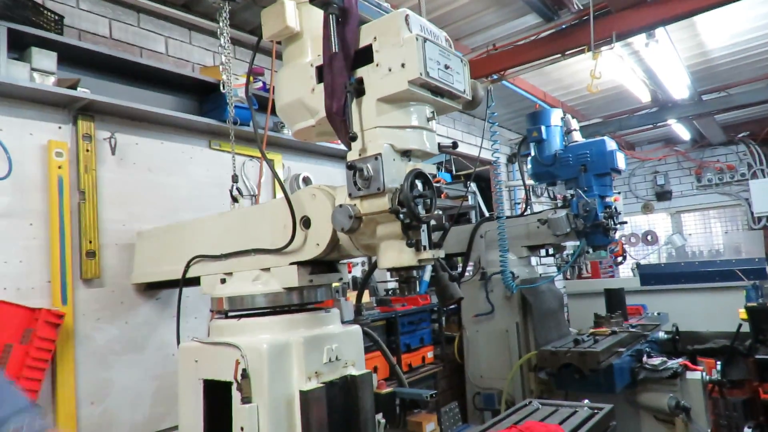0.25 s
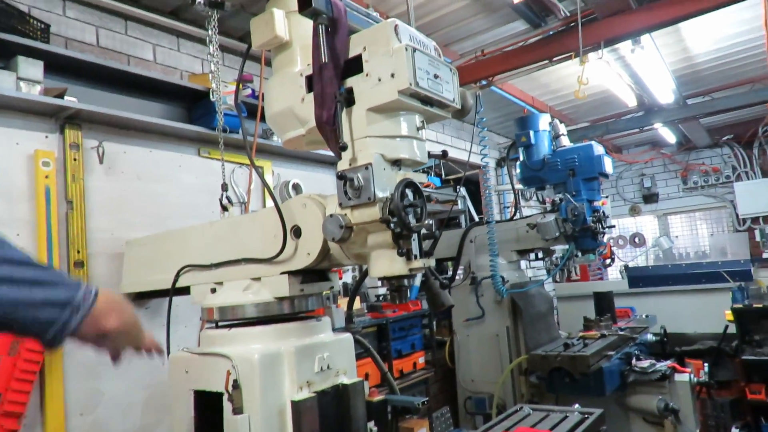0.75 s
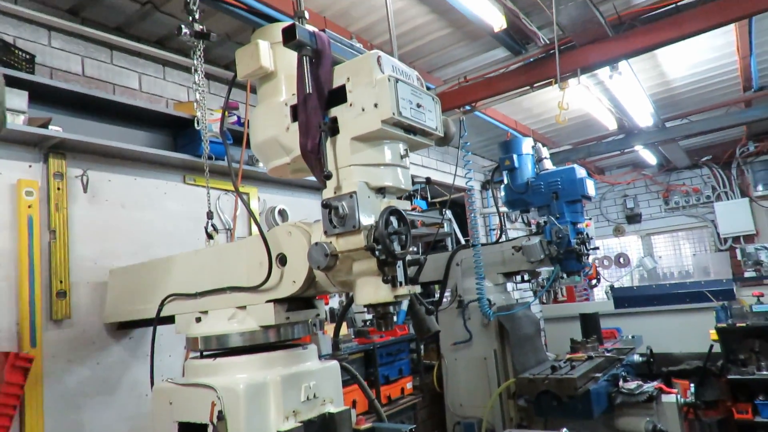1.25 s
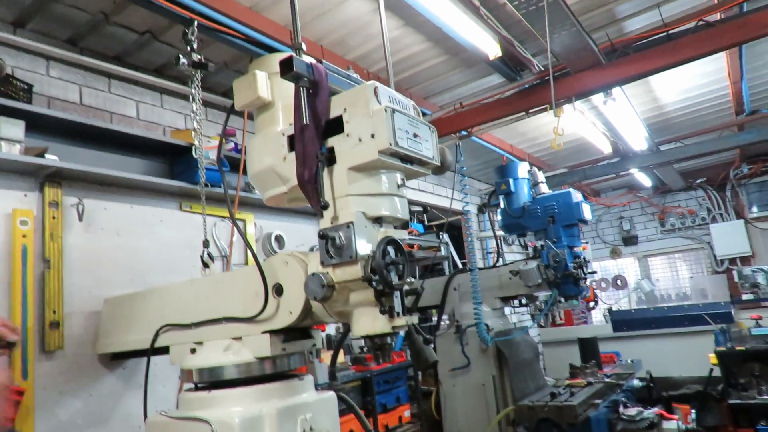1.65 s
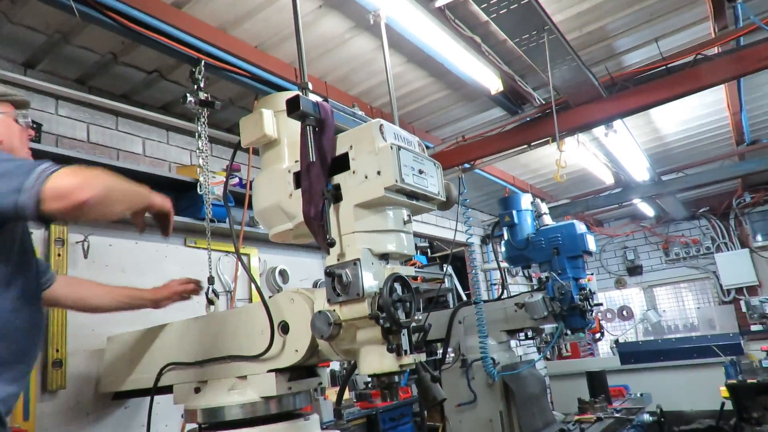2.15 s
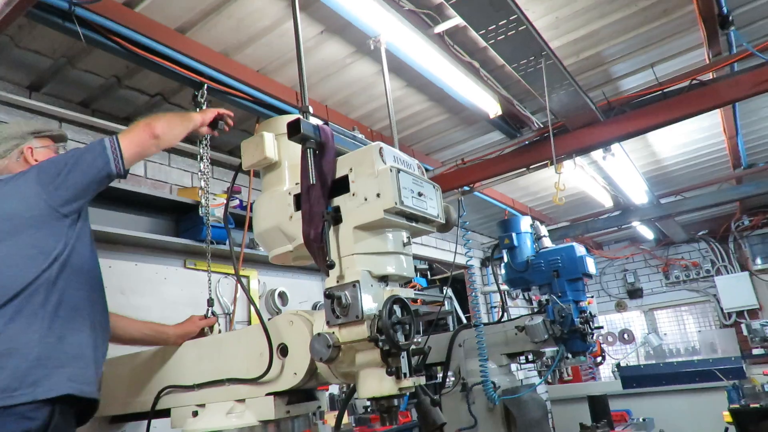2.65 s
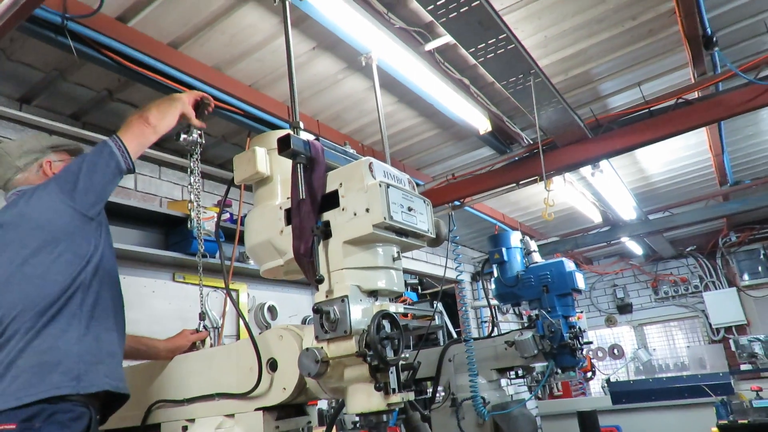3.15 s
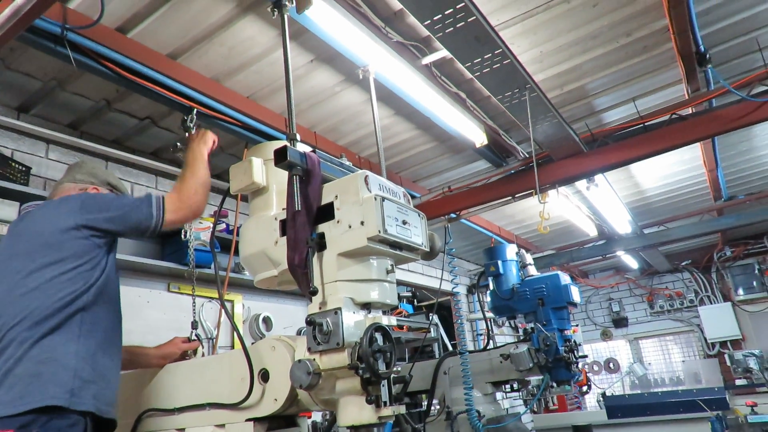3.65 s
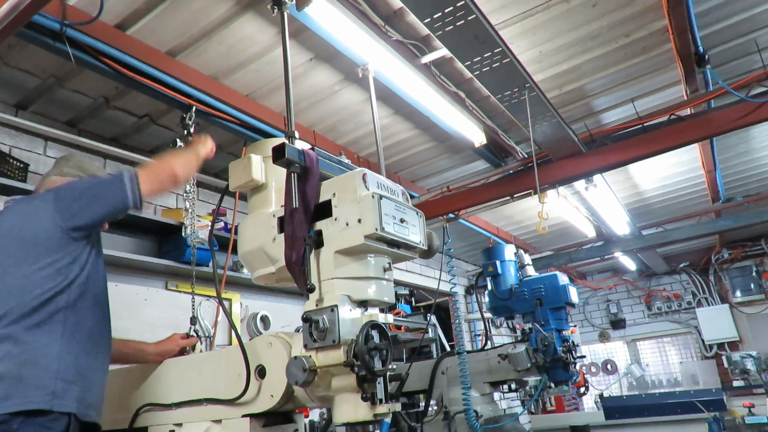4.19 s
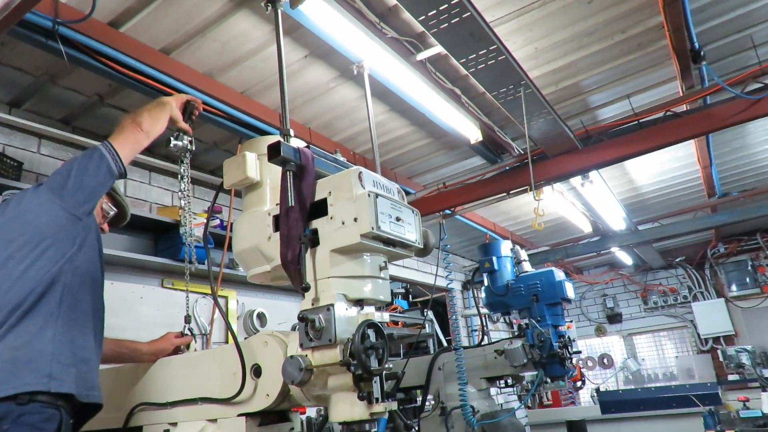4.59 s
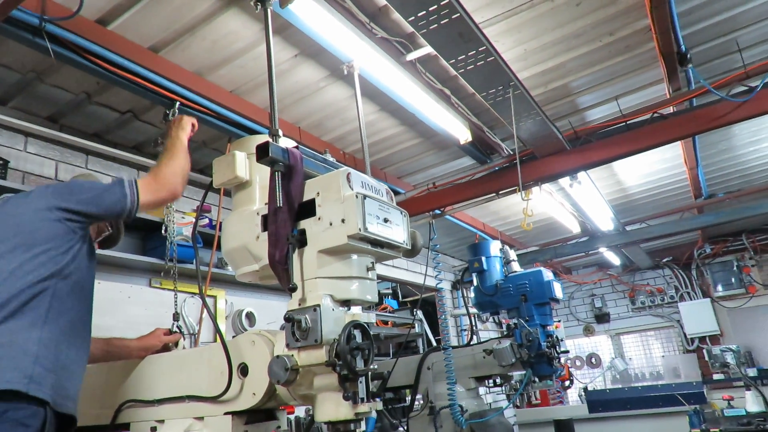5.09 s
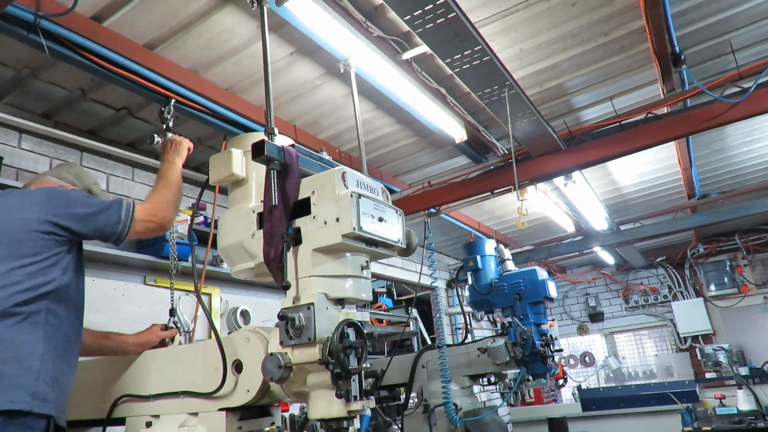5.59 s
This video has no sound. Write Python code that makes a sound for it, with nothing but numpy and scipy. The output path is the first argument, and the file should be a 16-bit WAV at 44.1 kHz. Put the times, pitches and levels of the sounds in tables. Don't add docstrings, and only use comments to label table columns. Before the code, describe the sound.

Loose knocks and shuffling steps in a workshop, then a hand-cranked chain hoist snaps, clanks and rings over a faint lamp hum.

```python
import sys
import numpy as np
from scipy import signal
from scipy.fft import rfft, irfft, next_fast_len
from scipy.io import wavfile
from scipy.ndimage import uniform_filter1d

SR = 44100
rng = np.random.default_rng(int(sys.argv[2]) if len(sys.argv) > 2 else 0)


def field_ratio(decibels):
    return 10 ** (np.asarray(decibels, dtype=float) / 20)


def store_wav(level_fs):
    pcm = np.round(np.clip(np.atleast_2d(level_fs), -1, 1) * 32767)
    wavfile.write(sys.argv[1], SR, pcm.T.astype(np.int16))


N = 257058
HALF_OCTAVES_HZ = 100 * 2 ** np.arange(0, 7.4, .5)


def band(x, lo_hz, hi_hz):
    return signal.sosfilt(signal.butter(2, [lo_hz, hi_hz], "band", fs=SR, output="sos"), x)


def level(x, db):
    return x * field_ratio(db) / np.sqrt(np.mean(x ** 2))


def on_log(table, hz):
    f, v = np.transpose(table)
    return np.interp(np.log(np.maximum(hz, 1)), np.log(f), v)


def walk(rate):
    hold = int(SR / rate)
    steps = np.repeat(rng.standard_normal(N // hold + 1), hold)
    return 1.1 * uniform_filter1d(uniform_filter1d(steps, hold), hold)[:N]


def ring(x, hz, t60):
    r = np.exp(-np.log(1000) / (t60 * SR))
    w = 2 * np.pi * hz / SR
    return signal.lfilter([np.sin(w)], [1, -2 * r * np.cos(w), r * r], x)


# frequency in Hz, level in dB.
COLOUR = [(280, -0.15), (570, -0.2), (800, -7.5), (1130, -4), (2260, -1.13), (4500, 0.33), (6400, -2.5),
          (12800, -3.5)]


def spread(db, edges_hz, bass_db, top_db):
    lo, hi = np.transpose(edges_hz)
    points = sorted(zip(np.sqrt(lo * hi), np.array(db) - 10 * np.log10(hi - lo)))
    points = [(90, points[0][1] + bass_db)] + points + [(16000, points[-1][1] + top_db)]
    width_db = 10 * np.log10(HALF_OCTAVES_HZ * (2 ** .25 - 2 ** -.25))
    return on_log(points, HALF_OCTAVES_HZ) + on_log(COLOUR, HALF_OCTAVES_HZ) + width_db


# frequency in Hz, level in dB per Hz.
CAPSULE_HISS = [(59, -59), (100, -25), (1090, -3), (1160, -8), (15000, -34)]


def capsules():
    size = next_fast_len(N)
    hz = np.arange(size // 2 + 1) * SR / size
    spectrum = rfft(rng.standard_normal((2, size))) * field_ratio(on_log(CAPSULE_HISS, hz)) * (hz > 80)
    return level(irfft(spectrum, size)[:, :N], -57.5)


def hum():
    hum_hz, hum_db = 96.7, -60.5
    waver_db = 1.5 * walk(3) + 2.5 * walk(14)
    return level(np.sin(2 * np.pi * hum_hz * np.arange(N) / SR) * field_ratio(waver_db), hum_db)


# time in seconds, effort in dB.
EFFORT = [(0.03, -62.5), (0.14, -61), (0.45, -48), (0.62, -45), (0.8, -51.5), (1.2, -57.5), (1.72, -52),
          (2.3, -47.5), (2.66, -57.5), (2.86, -40.5), (3.45, -52.5), (3.68, -54), (4.22, -44), (4.8, -47.5),
          (4.97, -51), (5.46, -40), (5.62, -50), (5.8, -52.5)]


def stir():
    edges_hz = [(150, 700), (750, 3600), (3600, 14500)]
    usual_db = -51
    # offset in dB, dB gained per dB of effort
    kinds = [(-0.54, 0.84), (-1.7, 1.26), (-18, 1)]
    rows = []
    for _, effort_db in EFFORT:
        layers_db = [usual_db + off + gain * (effort_db - usual_db) for off, gain in kinds]
        rows.append(spread(layers_db, edges_hz, bass_db=-3.5, top_db=-4.5))
    fidget_db = 1.5 * walk(12)
    times = np.arange(N) / SR
    starts = np.array(EFFORT)[:, 0]
    power = []
    for column in np.transpose(rows):
        flicker_db = 1.94 * walk(11)
        power.append(field_ratio(2 * (np.interp(times, starts, column) + fidget_db + flicker_db)))
    return np.array(power)


# frequency in Hz, time to fall 60 dB in seconds.
ROOM_T60 = [(100, 0.36), (300, 0.46), (1000, 0.47), (3000, 0.43), (8000, 0.25), (14000, 0.24)]
# frequency in Hz, side level minus mid level in dB.
WIDTH = [(60, -40), (125, -41), (250, -14), (500, -12.5), (2000, -12), (4000, -10.5), (8000, -4),
         (12000, -3)]


def room(blow_power, steady_power, grain_db):
    grains = field_ratio(grain_db * rng.exponential(size=N))
    near_t60, near_db, far_db = 0.051, -2, -1.5
    near_keep = np.exp(-2 * np.log(1000) / (near_t60 * SR))
    out = 0
    for hz, blow, background in zip(HALF_OCTAVES_HZ, blow_power, steady_power):
        far_keep = np.exp(-2 * np.log(1000) / (on_log(ROOM_T60, hz) * SR))
        stored = signal.lfilter([1], [1, -far_keep], blow) * field_ratio(2 * far_db) + background
        stored = stored + signal.lfilter([1], [1, -near_keep], blow) * field_ratio(2 * near_db)
        noise = rng.standard_normal((2, N)) * grains
        echoes = level(band(noise, hz / 2 ** .25, min(hz * 2 ** .25, .4 * SR)), 0)
        out = out + echoes * np.sqrt(stored) * np.array([[1], [field_ratio(on_log(WIDTH, hz))]])
    return out


# frequency in Hz, width in Hz, level in dB.
BEAM_MODES = [(50, 41, -8), (73, 7.5, -4), (104.8, 12.3, 0.5), (128.9, 12, -2), (199.3, 95, 2.5)]
# time in seconds, rumble in dB, hold in seconds.
LOADS = [(0.83, -53, .012), (1.414, -55, .012), (2.02, -51, .022), (2.416, -61, 0.27), (3.25, -59, 0.1),
         (3.873, -31, .022), (3.922, -39, 0.2), (4.444, -45, 0.037), (4.666, -38.5, 0.014),
         (5.2, -49, 0.076), (5.693, -44, .04)]


def beam():
    sway_db, growth_db_s, rise_db_s, fall_db_s = -75.5, 5, 223, 135
    t = np.arange(N) / SR
    power = field_ratio(2 * (sway_db + growth_db_s * t))
    for s, db, hold in LOADS:
        rise_db = rise_db_s * np.maximum(s - t, 0)
        fall_db = fall_db_s * np.maximum(t - s - hold, 0)
        power = power + field_ratio(2 * (db - rise_db - fall_db))
    shake = rng.standard_normal((len(BEAM_MODES), N))
    modes = sum(level(band(x, hz - w / 2, hz + w / 2), g) for x, (hz, w, g) in zip(shake, BEAM_MODES))
    return modes * np.sqrt(power) * field_ratio(-5.0)


def split_blows(events, material):
    edge_db, air_db, air_gain, usual_ms = material
    rows = []
    for s, db, weight, hard, *ms in events:
        contact_ms = ms[0] if ms else usual_ms
        rows.append((s, db, db + weight, db + edge_db + hard, db + air_db + air_gain * hard, contact_ms))
    return rows


def small_parts(link, colour_db, ms, size):
    t = np.arange(size) / SR
    hz = 260 * 2 ** (4.3 * link[0])
    db = on_log(list(zip(HALF_OCTAVES_HZ, colour_db)), hz)
    t60 = (.17 + .2 * link[1]) * (1 - .5 * link[0])
    fade = np.exp(-np.log(1000) * t / t60) * (1 - np.exp(-t * 1000 / max(ms, .3)))
    return np.sum(field_ratio(db) * fade * np.sin(2 * np.pi * (hz * t + link[2])), axis=0)


BANDS_HZ = [(800, 2000), (150, 800), (2000, 5500), (5500, 15500)]
# delay in ms, level in dB.
EARLY = [(2.2, -5), (5.1, -3), (7.4, -6), (10.2, -5), (14.5, -9), (19, -12.5)]


def blows(events, modes, crack_db, ring_db, uneven_db, bass_db, top_db):
    t = np.arange(2048) / SR
    long = 3 * len(t)
    chatter = rng.standard_normal((len(events), len(t)))
    luck = rng.standard_normal((len(events), len(modes) + len(EARLY)))
    links = rng.random((len(events), 3, 24, 1))
    push, strike, jingle = np.zeros((4, N + len(t))), np.zeros((len(modes), N)), np.zeros(N + long)
    power = np.zeros((len(HALF_OCTAVES_HZ), N + len(t)))
    home = [next(k for k, (lo, hi) in enumerate(BANDS_HZ) if lo <= m[0] < hi) for m in modes]
    for (s, *db, ms), noise, chance, link in zip(events, chatter, luck, links):
        start = int(s * SR)
        force = 0.077 * noise * np.exp(-t / 0.003)
        force[0] = 1
        for (lag_ms, echo_db), c in zip(EARLY, chance[len(modes):]):
            force[int(lag_ms * (1 + .04 * c) * SR / 1000)] += np.sign(c) * field_ratio(echo_db)
        push[:, start:start + len(t)] += field_ratio(np.array(db))[:, None] * force
        strike_db = np.array(db)[home] + uneven_db * chance[:len(modes)]
        strike[:, start] += np.sign(noise[:len(modes)]) * field_ratio(strike_db)
        colour_db = spread(db, BANDS_HZ, bass_db, top_db)
        jingle[start:start + long] += small_parts(link, colour_db, ms, size=long)
        contact = np.exp(-t * 1000 / max(ms, .3))
        power[:, start:start + len(t)] += field_ratio(2 * colour_db)[:, None] * contact / contact.sum()
    crack = 0
    for p, (lo, hi), sign in zip(push, BANDS_HZ, (1, -1, -1, 1)):
        crack = crack + sign * band(p[:N], lo, hi) * np.sqrt(SR / 2 / (hi - lo))
    body = 0
    for p, (hz, db, t60) in zip(strike, modes):
        body = body + field_ratio(db + 4 * walk(45)) * (ring(p, hz, t60) - ring(p, hz, .03))
    return field_ratio(crack_db) * crack + field_ratio(ring_db) * body + field_ratio(1) * jingle[:N], power[:, :N]


# time in seconds, strength, weight and hardness in dB.
STEPS = [(0.168, -43, 4, 0.5), (0.579, -47, 0, -28), (0.705, -53, -3, -1), (1.339, -51.5, 4.5, -6),
         (1.408, -27.5, 0, -6), (1.969, -46, 21, 0.5), (2.064, -43.5, 7, -13), (2.1, -45.5, 8.5, -15),
         (2.139, -54, -4, -17), (2.399, -48.5, 6.5, 0.5), (4.749, -65.5, 31.5, -5), (4.86, -59.5, 20.5, -8),
         (5.298, -50, 10, -14)]
# edge in dB, air in dB, air gained per dB of hardness, contact in ms.
SOLE = (-3, -21, -0.2, 6)
# frequency in Hz, level in dB, time to fall 60 dB in seconds.
FLOOR_MODES = [(182, -2, 0.11), (259.5, -3.5, 0.15), (348.4, 6.5, 0.13), (387.6, 0.5, 0.11),
               (513, -9, 0.13), (592, -11, 0.21), (920, -5, 0.22), (1212, -11, 0.17), (1520, -9, 0.28),
               (2470, -12, .2)]


def footsteps():
    return blows(split_blows(STEPS, SOLE), FLOOR_MODES,
                 crack_db=2, ring_db=-3.5, uneven_db=3.5, bass_db=-12, top_db=-11)


# time in seconds, strength, weight and hardness in dB.
KNOCKS = [
    (0.727, -65, -6, 18.5),
    (1.628, -81, 3, 21),
    (1.688, -72, -4, 16),
    (2.182, -38.5, -36, -13.5),
    (2.705, -40.5, -5, -10),
    (3.6, -46.5, -7, -13),
    (5.135, -37, -7, -10.5),
]
# time in seconds, strength, weight and hardness in dB.
SCUFFS = [
    (1.44, -38, -12, 1),
    (1.47, -39, -14, -1),
    (1.505, -35, -10, -1),
    (1.54, -43.5, -5, 1),
]
# edge in dB, air in dB, air gained per dB of hardness, contact in ms.
THING = (-1.15, -7, 1.49, -0.5)
GRIT = (-4.8, -8, 2, 8)
# frequency in Hz, level in dB, time to fall 60 dB in seconds.
THING_MODES = [(185, -6, .2), (290, -2, .2), (373, -1, .2), (505, -5, .2), (575, -4, .22), (910, -8, .22),
               (1230, -4, .3), (1520, -4, .36), (2500, -9, .33), (2750, -10, .3)]


def loose_things():
    return blows(split_blows(KNOCKS, THING) + split_blows(SCUFFS, GRIT), THING_MODES,
                 crack_db=1, ring_db=-10, uneven_db=1.5, bass_db=-15, top_db=-8)


# time in seconds, strength, weight and hardness in dB, contact in ms.
CLACKS = [
    (0.258, -23, -28.5, -8.5, 9.7),
    (0.809, -16.5, -9, -5.5, 0.73),
    (0.82, -30, -18, 7.5, 1.3),
]
# edge in dB, air in dB, air gained per dB of hardness, contact in ms.
CRATE = (-0.4, -12, 1.86, 3)
# frequency in Hz, level in dB, time to fall 60 dB in seconds.
CRATE_MODES = [(333, 12.5, 0.15), (583, 6.5, 0.24), (900, -15, 0.25), (1060, -11, .19), (1340, -5, 0.19),
               (1530, -8, 0.39), (1676, -1, 0.2), (2062, -21, .21), (2415, -2, .24), (2650, -6.5, .38),
               (3381, -12, .17), (4151, -11, 0.34)]


def crate():
    clacks, power = blows(split_blows(CLACKS, CRATE), CRATE_MODES,
                          crack_db=18, ring_db=-5, uneven_db=2.5, bass_db=-6, top_db=-20)
    return signal.sosfilt(signal.butter(2, 5600, fs=SR, output="sos"), clacks), power


# time in seconds, strength in dB.
LEVER_HITS = [
    (3.919, -34.5),
    (4.406, -45),
    (4.456, -27.5),
    (4.592, -32),
]


def lever():
    lever_hz, split_hz, t60 = 2577, 30, .52
    strike = np.zeros(N)
    for s, db in LEVER_HITS:
        strike[int(s * SR)] = field_ratio(db)
    return sum(field_ratio(5.5 * walk(30.1)) * ring(strike, lever_hz + side * split_hz / 2, t60) for side in (-1, 1))


# time in seconds, strength, weight and hardness in dB, contact in ms.
CLANKS = [
    (3.862, -14.5, -10, -13.5, 15),
    (3.898, -22.5, 1.5, 0, 30),
]
# edge in dB, air in dB, air gained per dB of hardness, contact in ms.
HOOK = (-1.3, -14.5, -0.35, 15)
# frequency in Hz, level in dB, time to fall 60 dB in seconds.
HOOK_MODES = [(267, -6, .35), (385, -9, .4), (626, -3, .25), (915, -1, .3), (962, 4, .36), (993, -2.5, .3),
              (1039, 4, .28), (1168, 2, .24), (1192, -1, .3), (1475, -7, .2), (1986, -2.5, .3),
              (2300, -4, .2), (2700, -2, .3), (3015, -5, .42)]


def hook():
    return blows(split_blows(CLANKS, HOOK), HOOK_MODES,
                 crack_db=14.5, ring_db=-4, uneven_db=-0.3, bass_db=-8, top_db=0.5)


# time in seconds, strength, weight and hardness in dB, contact in ms.
PAWL = [(2.884, -21, -16.5, -3, 4.2), (2.997, -22.5, -7.5, -1, 4.8), (3.2, -38, -3.5, -0.5, 4),
        (3.759, -29.5, -3.5, 0.3, 15), (3.991, -31.5, -2, 1, 8.6), (4.352, -21.5, -12.5, -1.5, 4.2),
        (4.404, -20.5, -12.5, -1.4, 5.6), (4.456, -20.5, -3, -2, 5.7), (4.591, -23, -1.5, -3.5, 9.7),
        (5.18, -32.5, -7.5, 1.7, 10), (5.312, -33, -3.5, -6, 5.5), (5.322, -40, -8, 6, 2.6),
        (5.486, -35.5, -27, -0.7, 21), (5.5, -36.5, -11.5, 3, 2.3), (5.631, -24, -9.5, -18.5, 6.1),
        (5.635, -63, -5, 12, 5)]
# time in seconds, strength, weight and hardness in dB.
CHAIN = [(2.767, -45, -25, -11), (2.8, -43.5, -29, -2.5), (2.977, -32, -9, -2), (3.26, -36, -8.5, -6.5),
         (3.509, -55, -4, -0.5), (3.712, -53.5, -19, 2.5), (4.248, -46.5, -24, -0.5),
         (4.278, -46.5, -22, 1), (4.836, -47.5, -22, -9), (4.896, -55, -5, 0.5)]
# edge in dB, air in dB, air gained per dB of hardness, contact in ms.
STEEL = (-0.5, 0.9, 1.89, 5)
LINK = (2, -7, 2.1, 4)
# frequency in Hz, level in dB, time to fall 60 dB in seconds.
HOIST_MODES = [(542, -10, 0.42), (659, -7, 0.54), (939, -8.5, 0.49), (1202, -4.5, 0.25), (1580, -12, 0.52),
               (1756, -1.5, 0.29), (1998, -11, 0.5), (2180, -11.5, 0.27), (2664, -15.5, 0.75),
               (2990, -10, 0.52), (3420, -11.5, 0.37), (3880, -4, 0.15), (4980, -9, 0.14),
               (5320, -8.5, 0.17)]


def ratchet():
    return blows(split_blows(PAWL, STEEL) + split_blows(CHAIN, LINK), HOIST_MODES,
                 crack_db=11.5, ring_db=-5.5, uneven_db=3, bass_db=-5.5, top_db=-4.5)


def scene():
    sources = [footsteps(), loose_things(), crate(), hook(), ratchet()]
    direct = sum(sound for sound, _ in sources)
    blow_power = sum(power for _, power in sources)
    mid, side = room(blow_power, stir(), grain_db=2.0)
    no_bass = signal.butter(3, 120, "high", fs=SR, output="sos")
    near = signal.sosfilt(no_bass, mid + direct + lever())
    short_waves = signal.butter(2, 9000, "high", fs=SR, output="sos")
    side = side + field_ratio(-2.5) * signal.sosfiltfilt(short_waves, np.gradient(near))
    mid = near + beam() + hum()
    return np.array([mid + side, mid - side]) + capsules()


def band_limit(x):
    return signal.sosfilt(signal.butter(12, 16440, fs=SR, output="sos"), x)


def record(dry):
    top = signal.cheby2(8, 40, 15900, fs=SR, output="sos")
    mix = signal.sosfilt(top, dry)
    return band_limit(mix)


dry = scene()
out = record(dry)
store_wav(out)
```